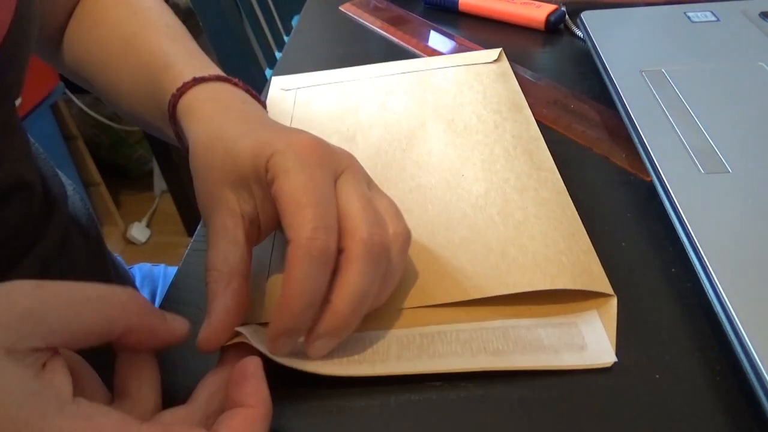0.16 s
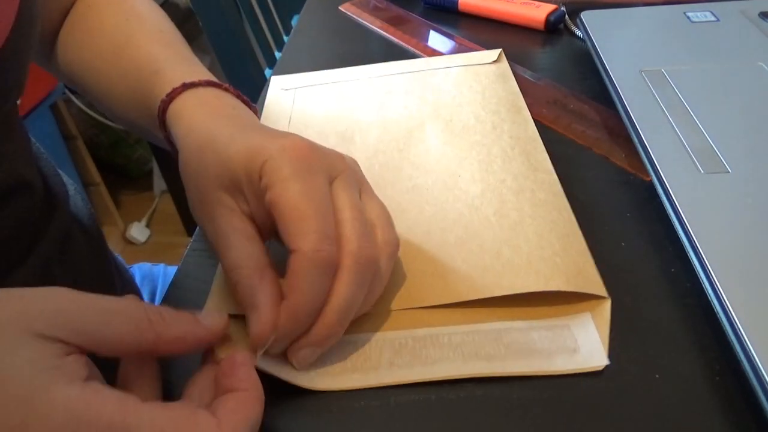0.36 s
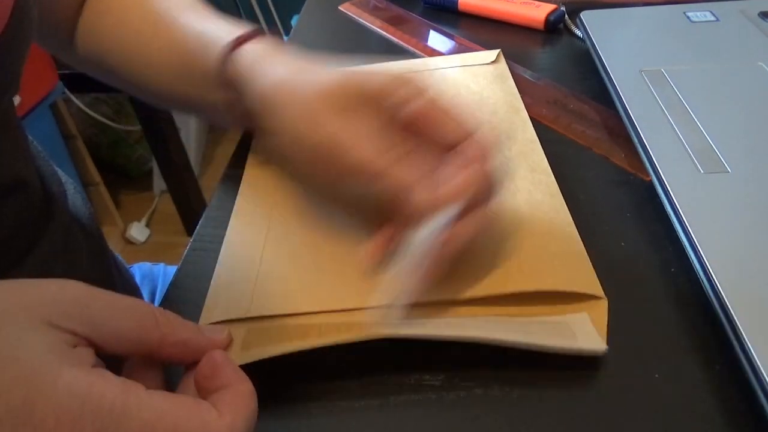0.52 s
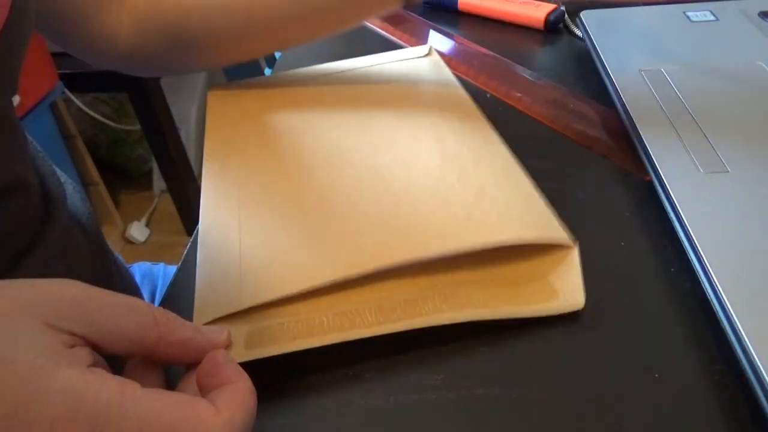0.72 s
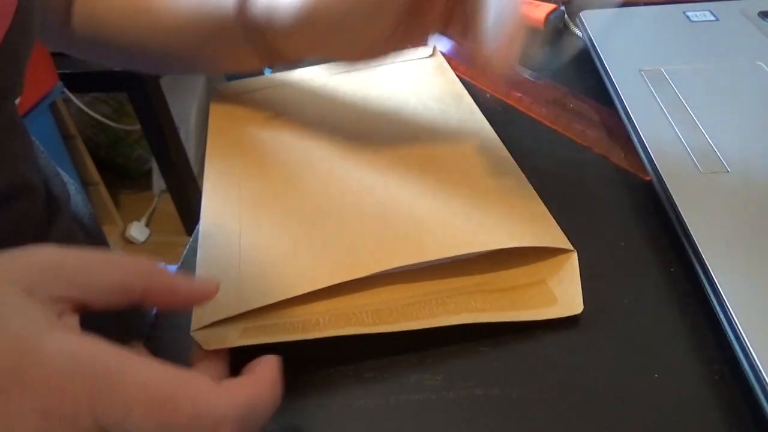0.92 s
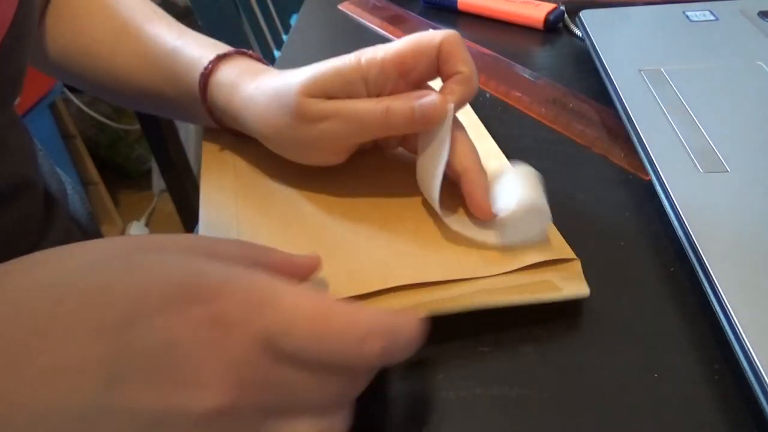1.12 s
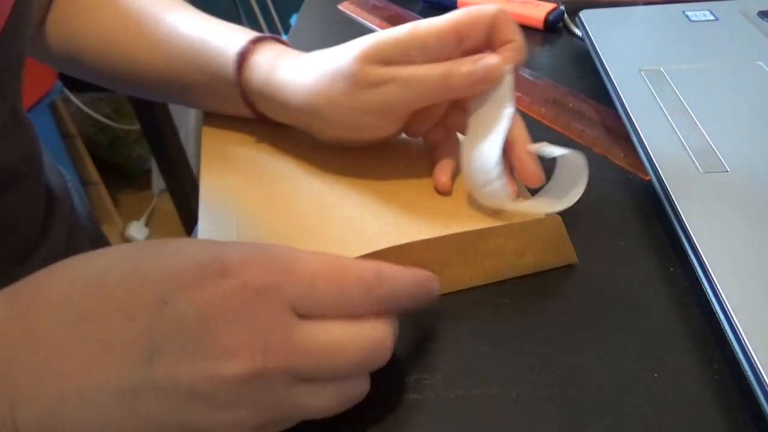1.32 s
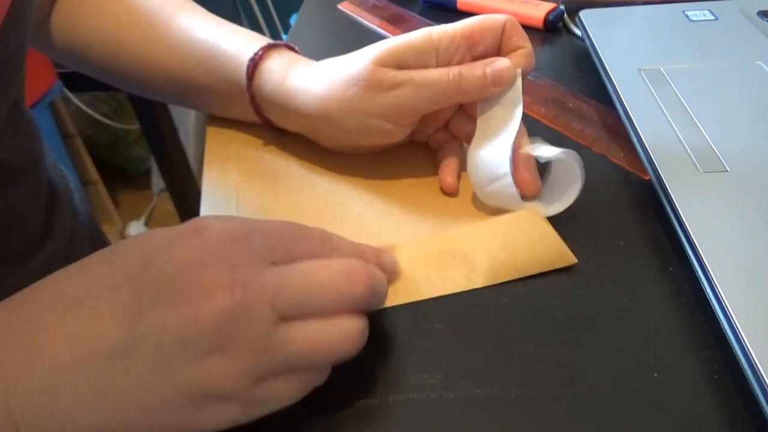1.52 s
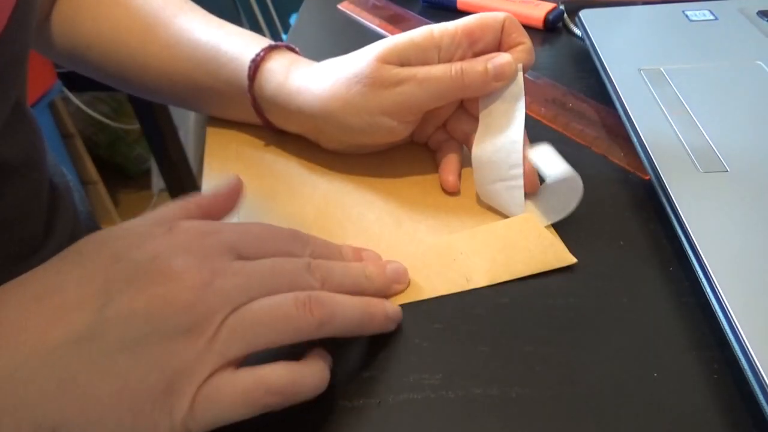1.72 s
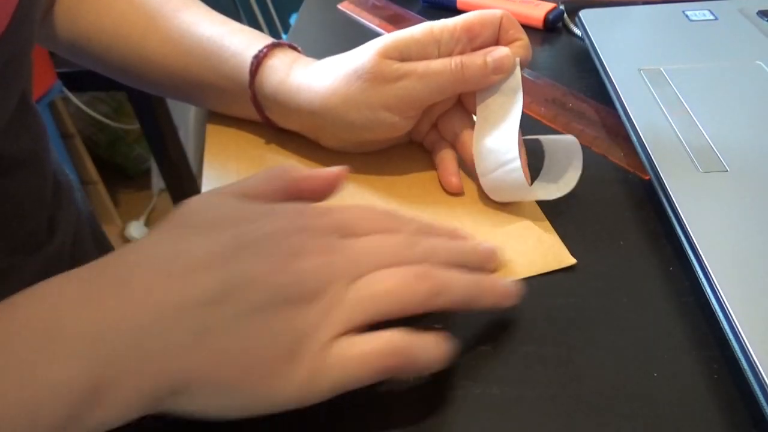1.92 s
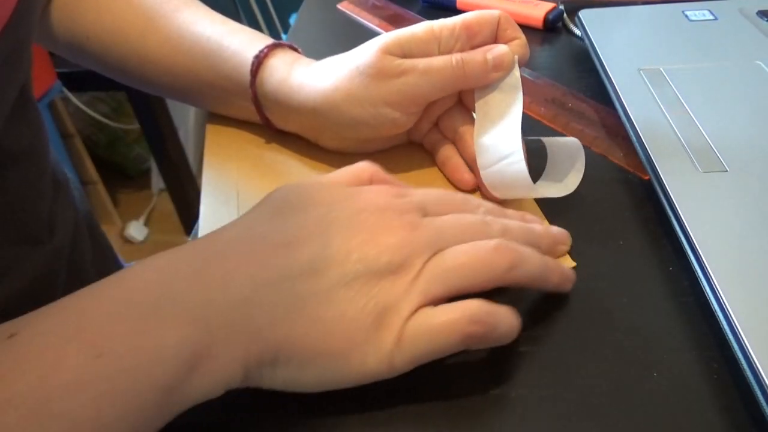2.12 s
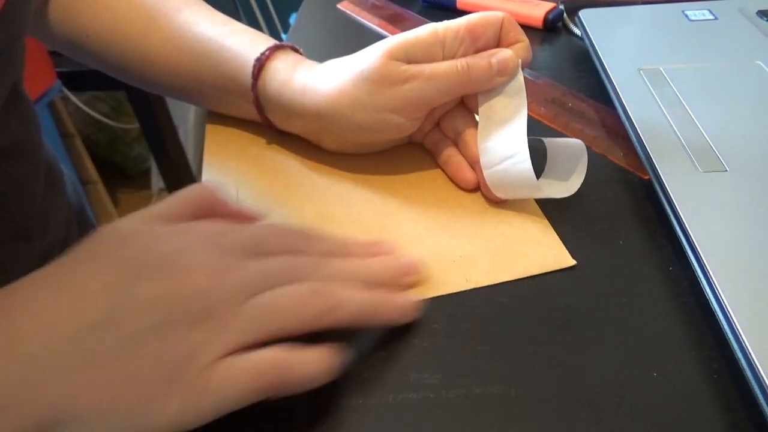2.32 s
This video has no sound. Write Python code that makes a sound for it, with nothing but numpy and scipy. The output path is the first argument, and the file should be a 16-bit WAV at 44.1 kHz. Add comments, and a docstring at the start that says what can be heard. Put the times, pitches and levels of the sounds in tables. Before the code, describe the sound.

A backing strip is peeled from a paper envelope, close up in a quiet room. Fingers scratch and pick with small snaps until a bright, crackling rip, the loudest sound, from 0.5 to 0.75 seconds. The envelope slides softly, then its flap folds with crisp crackles from 1.3 to 1.75. Two soft smoothing strokes follow at 1.9 and 2.25, with a very faint thin tone sagging at the end.

```python
"""Peeling and sealing an envelope

At a desk in a quiet room, fingers pick at the backing strip of a paper envelope and rip it off.
The glue yields by stick-slip: separate snaps, then a dense rasp whose resonances fall as the freed
strip grows. The envelope slides, its flap is folded over with a crackle, and a hand smooths it down,
each stroke sounding by friction on the fibres. A faint thin tone sags near the end."""
import sys
import numpy as np
from scipy import signal
from scipy.fft import rfft, irfft
from scipy.io import wavfile
from scipy.ndimage import uniform_filter1d

SR = 44100
rng = np.random.default_rng(int(sys.argv[2]) if len(sys.argv) > 2 else 0)


def waveform_to_disk(signal):
    """Save audio, clipped to [-1, 1], as 16-bit WAV at the path in sys.argv[1]."""
    frames = np.transpose(np.atleast_2d(signal))
    scaled = np.clip(frames, -1, 1) * 32767
    samples = np.round(scaled).astype(np.int16)
    wavfile.write(sys.argv[1], SR, samples)


N = 103635
T = np.arange(N) / SR
HZ = np.fft.rfftfreq(N, 1 / SR)

# Course of the rip: time_s, level_db, low_mids_relative_db
PEEL_STROKE = [(.49, -34.5, -9.5), (.53, -31, 1), (.56, -24.5, -7), (.615, -20.5, -3.5), (.675, -19.5, -4),
               (.714, -20, -6.5), (.729, -28, -12.5), (.76, -35, -10)]
# Spectrum of the rasp: frequency_hz, gain_db
PEEL_SPECTRUM = [(90, -25.5), (240, -11), (800, -2.5), (1900, 0), (4500, -3.5), (9000, 1), (12000, -12.5),
                 (16000, -20.5)]
def peel(slips_per_s=(150, 520), slip_decay_s=0.00099):
    """Stick-slip: glue lets go ever faster, each slip a burst of crackle that drives the paper."""
    rate = np.interp(T, [PEEL_STROKE[0][0], PEEL_STROKE[-1][0]], slips_per_s)
    jitter = np.exp(.5 * wander(100))
    slip_count = np.cumsum(rate * jitter) / SR
    since_slip_s = (slip_count % 1) / rate
    drive = grains(7000, 0.78, hiss=0.73) * (0.2 + np.exp(-since_slip_s / slip_decay_s))
    drive /= np.sqrt(uniform_filter1d(drive ** 2, size=900) + 1e-9)  # even out the power
    rasp = sheet(drive, PEEL_STROKE, PEEL_SPECTRUM, split_hz=3500)
    return rasp + freed_strip(drive) + crinkles(PEEL_STROKE, per_s=260, boost_db=3.5, hz=2640)


# Modes of the freed strip: peak_s, spread_s, pitch_at_peak_hz, fall_octaves_per_s, level_db
STRIP_MODES = [(0.661, 0.02, 1495, 10, -28.5), (0.641, 0.033, 2490, 6, -30), (.66, 0.018, 3490, 9.9, -25),
               (.62, 0.02, 4800, 5.1, -26)]
def freed_strip(drive, bandwidth_hz=810):
    """Forced resonance: the strip's natural frequencies fall as it lengthens."""
    pole = np.exp(-np.pi * bandwidth_hz / SR)
    out = np.zeros(N)
    for s, spread, hz, fall, db in STRIP_MODES:
        pitch = hz * 2 ** (-fall * np.clip(T - s, -.1, .1))
        carrier = np.exp(2j * np.pi * np.cumsum(pitch) / SR)
        ring = (carrier * signal.lfilter([1], [1, -2 * pole, pole * pole], drive / carrier)).real
        swell = np.exp(-((T - s) / spread) ** 2 / 2)
        out += amp(db) * swell * ring / np.sqrt(np.average(ring ** 2, weights=swell ** 2))
    return out


SNAP_DECAY_S = 0.00052
# Snaps of glue and paper: start_s, level_db, centre_hz, width_octaves
RELEASES = [(0.0105, -21, 5060, 3.7), (0.3677, -12.5, 9500, 1.2), (.4030, -10.5, 4700, 0.66),
            (0.5279, -14.5, 7560, 0.58), (0.534, -23, 3000, 2), (0.5385, -9, 2290, 1.5),
            (0.5456, -12, 3000, 3.7), (.5612, -7, 7600, 0.38), (0.5785, -11, 7000, 1.2),
            (0.5846, -17, 6530, 1.7), (0.7057, -18, 1700, 2.4), (0.7196, -10.5, 7660, 0.58),
            (1.4390, -20, 1960, 1.43), (1.5093, -12.5, 3700, 1.75), (1.5865, -10.5, 6200, 0.94),
            (1.5912, -11, 6360, 0.3), (1.5950, -11.5, 5640, 1.1), (1.6006, -7, 4150, 0.64),
            (1.6140, -13, 5400, 0.61), (1.734, -12.5, 6200, 1.2)]
def snaps():
    """Impulsive release: glue and paper give way, the broader snaps lasting longer."""
    out = np.zeros(N)
    for s, db, hz, octaves in RELEASES:
        add(out, s, impulse(db, hz, octaves, SNAP_DECAY_S * np.sqrt(octaves), crack=0.55))
    return out


def crinkles(stroke, per_s, boost_db, hz):
    """Random impulses: small patches of paper snap during a stroke, each in its own band."""
    s, level, _ = np.transpose(stroke)
    length_s = s[-1] - s[0]
    out = np.zeros(N)
    for when, weakness, height in rng.random((round(per_s * length_s), 3)):
        start_s = s[0] + when * length_s
        db = np.interp(start_s, s, level) + boost_db - 10 * weakness
        centre_hz = hz * 2 ** (2 * height - 1)
        add(out, start_s, impulse(db, centre_hz, octaves=0.46, decay_s=SNAP_DECAY_S, crack=.5))
    return out


FIBRES_PER_S = 2500
# Strokes of skin and paper: time_s, level_db, low_mids_relative_db
PICK_STROKE = [(0, -36, -12), (.07, -35.5, -22.5), (.145, -32.5, -7), (.19, -34, -9), (.24, -30, -11.5),
               (.283, -32.5, -16), (.295, -24.5, -15.5), (.385, -34.5, -9.5), (.445, -39.5, -12),
               (.463, -29, -9.5), (.49, -41.5, 7.5)]
SLIDE_STROKE = [(.76, -33, -6.5), (.83, -44, -10), (.92, -52, -16), (.98, -39, -35.5), (1.045, -47.5, -26),
                (1.075, -38.5, -15.5), (1.14, -45, -22), (1.2, -41, -9), (1.27, -44.5, -13.5)]
FOLD_STROKE = [(1.27, -47.5, -7), (1.298, -27.5, -7), (1.39, -44, -0.5), (1.46, -40, -4.5),
               (1.525, -39.5, -7.5), (1.615, -26.5, -11), (1.68, -37, -16), (1.733, -27, -15),
               (1.742, -46.5, -9), (1.82, -60, -21)]
SMOOTH_STROKE = [(1.85, -56.5, -7), (1.9, -37, -19.5), (2.09, -41, -16), (2.17, -58, -7.5),
                 (2.205, -56.5, -10), (2.235, -41.5, -23), (2.35, -39.5, -21)]
# Their friction spectra: frequency_hz, gain_db
PICK_SPECTRUM = [(120, -30), (600, -17), (1100, -15), (1800, -0.5), (3200, -9.5), (4900, 0), (6200, -6),
                 (8700, -2), (16000, -23.5)]
PAPER_SPECTRUM = [(150, -22.5), (550, -7), (1600, 0), (3000, -1), (8500, 3), (12000, -8), (16000, -20)]
SMOOTH_SPECTRUM = [(150, -20), (700, -22), (1800, -15), (2800, -9.5), (5500, -9), (8800, 1), (16000, -17)]
def strokes():
    """Friction noise: picking, sliding, folding the flap with a crackle, then smoothing it."""
    pick = rub(PICK_STROKE, PICK_SPECTRUM, grain_db=1.1)
    slide = rub(SLIDE_STROKE, PAPER_SPECTRUM, grain_db=2.5)
    fold = rub(FOLD_STROKE, PAPER_SPECTRUM, grain_db=3.0)
    fold += crinkles(FOLD_STROKE, per_s=100, boost_db=6, hz=3300)
    smooth = rub(SMOOTH_STROKE, SMOOTH_SPECTRUM, grain_db=2.0)
    return pick + slide + fold + smooth


def rub(stroke, spectrum, grain_db, judder_db=1.36):
    """Sliding friction: skin and paper catch on fibres, and an uneven grip modulates the level."""
    grip = amp(judder_db * wander(260))
    return sheet(grains(FIBRES_PER_S, grain_db, hiss=1) * grip, stroke, spectrum, split_hz=2850)


# Scuffs of paper on paper: start_s, length_s, level_db, centre_hz, width_octaves
PAPER_SCUFFS = [(1.2906, 0.0072, -20, 7800, 0.38), (1.567, 0.0066, -27.5, 1940, 1),
                (1.8227, 0.026, -28, 5600, 1.2), (1.886, 0.0073, -29, 4330, 1.22)]
def scuffs():
    """Transient friction: a brief contact bites quickly and runs out."""
    out = np.zeros(N)
    for s, length, db, hz, octaves in PAPER_SCUFFS:
        progress = np.clip((T - s) / length, 0, 1)
        swell = np.sqrt(np.minimum(10 * progress, 1 - progress))
        out += amp(db) * swell * tint(grains(FIBRES_PER_S, 2.2, hiss=1), patch(HZ, hz, octaves))
    return out


# Taps and rings of the envelope: start_s, level_db, centre_hz, width_octaves, decay_s
PAPER_TAPS_AND_RINGS = [(0.01, -52.5, 640, 0.73, 0.081), (0.9008, -32.5, 980, 1.03, 0.0022),
                        (1.073, -48, 830, 1.4, 0.055), (1.402, -39.5, 1740, 0.23, 0.017),
                        (1.441, -31, 1030, 1.6, 0.0065), (1.981, -36, 1050, 0.95, 0.0015)]
def taps_and_rings():
    """Damped vibration: soft taps and brief hollow rings of the envelope as it is handled and folded."""
    out = np.zeros(N)
    for s, *tap in PAPER_TAPS_AND_RINGS:
        add(out, s, impulse(*tap, crack=0.17))
    return out


def impulse(db, hz, octaves, decay_s, crack, size=4096):
    """Impulse response: a click and a dying flutter, filtered by the patch of paper that moves."""
    t = np.arange(size) / SR
    burst = unit(rng.standard_normal(size) * np.exp(-t / decay_s))
    burst[0] -= crack * np.sqrt(size)
    gain = patch(abs(np.fft.fftfreq(size, 1 / SR)), hz, octaves) + 1e-5
    minimum_phase = np.exp(np.conj(signal.hilbert(np.log(gain))))  # no ringing before the onset
    sound = np.fft.ifft(np.fft.fft(burst) * minimum_phase).real
    return amp(db) * sound / np.linalg.norm(sound) * np.sqrt(decay_s * SR)


def grains(per_s, spread_db, hiss):
    """Shot noise: tiny clicks of uneven size over a bed of finer friction."""
    size = amp(spread_db * np.minimum(rng.exponential(1, N), 4)) * rng.choice([-1., 1.], N)
    clicks = size * (rng.random(N) < per_s / SR)
    return unit(clicks) + hiss * rng.standard_normal(N)


def sheet(drive, stroke, spectrum, split_hz, fade_s=0.0051):
    """Forced vibration: paper radiates a drive, its treble and low mids each following the stroke."""
    s, level, low = np.transpose(stroke)
    gate = np.clip(np.minimum(T - s[0], s[-1] - T) / fade_s + .5, 0, 1) ** .5
    gain = amp(read(spectrum, HZ))
    upper = 1 / (1 + (split_hz / (HZ + 1)) ** 6)
    treble = amp(np.interp(T, s, level)) * tint(drive, gain * upper)
    low_mids = amp(np.interp(T, s, level + low)) * tint(drive, gain * (1 - upper))
    return gate * (treble + low_mids)


def patch(f, hz, octaves, low_hz=202, top_hz=12250):
    """Radiation efficiency: a small patch sounds in one band, and little beyond low_hz to top_hz."""
    return hump(f, hz, octaves) * f ** 2 / (f ** 2 + low_hz ** 2) / (1 + (f / top_hz) ** 8)


# Resonances of the envelope: centre_hz, width_octaves, lift_db
CAVITY_MODES = [(550, 0.44, 2), (1770, 0.12, 1)]
def hollow(x):
    """Cavity resonance: the hollow envelope lifts two bands of everything done to it."""
    lift_db = sum(db * hump(HZ, hz, octaves) for hz, octaves, db in CAVITY_MODES)
    return irfft(rfft(x) * amp(lift_db), N)


# Course of the faint tone: time_s, pitch_hz, level_db
WHINE_GLIDE = [(1.76, 735, -68), (1.81, 731, -59), (1.9, 744, -70), (2.065, 733, -76), (2.105, 735, -55.5),
               (2.21, 727, -58.5), (2.245, 707, -50), (2.285, 669, -60.5), (2.35, 635, -54.5)]
def whine(fray_hz=90, fray_depth=.17):
    """Random modulation: a thin tone holds, then sags and frays into roughness."""
    s, hz, db = np.transpose(WHINE_GLIDE)
    waver, flutter = [tint(rng.standard_normal(N), np.exp(-(HZ / fray_hz) ** 2)) for _ in range(2)]
    pitch = np.interp(T, s, hz)
    fray = ((hz.max() - pitch) / np.ptp(hz)) ** 2
    phase = 2 * np.pi * np.cumsum(pitch * (1 + fray_depth * fray * waver)) / SR
    level_db = np.interp(T, s, db, left=-120) + (0.5 + 2 * fray) * flutter
    return amp(level_db) * unit(np.sin(phase) + amp(-12) * np.sin(2 * phase))


# Reverberation time: frequency_hz, t60_s
REVERB_TIMES = [(150, 0.58), (1000, 0.81), (14000, 0.4)]
# Spectral shape of the left-right difference: frequency_hz, weight_db
SIDE_SPECTRUM = [(450, -24), (1100, -22.5), (4500, -18), (9000, -17), (13000, -60)]
def room(x, tail_db=-20, desk_db=-19, desk_decay_s=0.0034):
    """Reflection: desk echoes and a short reverberant tail reach left and right in unlike mixtures."""
    t = np.arange(SR // 2) / SR
    hz, s, spectra = signal.stft(rng.standard_normal((2, len(t))), SR, nperseg=256)
    decay = amp(-60 * s / read(REVERB_TIMES, hz)[:, None])
    tail = signal.istft(spectra * decay, SR, nperseg=256)[1][:, :len(t)]
    early = rng.standard_normal((2, len(t))) * np.exp(-t / desk_decay_s) * (t > .0005)
    response = (amp(tail_db) * unit(tail) + amp(desk_db) * unit(early)) / np.sqrt(len(t))
    shared, apart = signal.fftconvolve(x[None], response, axes=1)[:, :N]
    shifting = x * wander(400)  # the sounding spot shifts across the paper
    side = irfft((.6j * rfft(shifting) + 5 * rfft(apart)) * amp(read(SIDE_SPECTRUM, HZ)), N)
    return x + shared + np.array([side, -side])


# Spectrum of the quiet room: frequency_hz, gain_db
AMBIENT_SPECTRUM = [(70, -5), (95, 8.5), (120, 1), (500, 10.5), (2000, 4.5), (5000, -19), (16000, -22)]
def ambience(shared_db=-58.5):
    """Partly coherent noise: a steady hush, mostly common to left and right."""
    left, right, both = [tint(rng.standard_normal(N), amp(read(AMBIENT_SPECTRUM, HZ))) for _ in range(3)]
    return amp(shared_db) * (both + .5 * np.array([left, right]))


def amp(db):
    """Decibels to gain."""
    return 10 ** (np.asarray(db) / 20)


def unit(x):
    """Normalisation to rms 1."""
    return x / np.sqrt(np.mean(x ** 2) + 1e-20)


def wander(samples):
    """Moving average of noise, at rms 1."""
    return unit(uniform_filter1d(rng.standard_normal(N), size=samples))


def read(points, hz):
    """Interpolation on a log-frequency axis."""
    f, value = np.transpose(points)
    return np.interp(np.log(hz + 1), np.log(f + 1), value)


def add(mix, s, sound):
    """Superposition of a sound at time s."""
    part = mix[max(round(s * SR), 0):][:len(sound)]
    part += sound[:len(part)]


def tint(x, gain):
    """Filtering by a gain for each frequency, to rms 1."""
    return unit(irfft(rfft(x) * gain, N))


def hump(hz, centre_hz, octaves):
    """A bell-shaped passband with gentle skirts."""
    return (1 + (np.log2((hz + 1) / centre_hz) / octaves) ** 2 / 2) ** -2


def scene():
    """Superposition: the paper and the faint tone sound in the room, over its quiet background."""
    paper = peel() + snaps() + taps_and_rings() + scuffs() + strokes()
    hush = ambience()
    return room(hollow(paper) + whine()) + hush


def record(dry, ceiling=0.8, wind_cut_hz=101, edge_hz=16000):
    """Saturation and band limiting: sharp peaks round off, deep bass and top treble fall away."""
    soft = ceiling * np.tanh(dry / ceiling)
    thin = signal.sosfilt(signal.butter(2, wind_cut_hz, "high", fs=SR, output="sos"), soft)
    low_pass = signal.firwin(511, edge_hz, window=("kaiser", 9), fs=SR)
    return signal.oaconvolve(thin, low_pass[None], "same")


dry = scene()
out = record(dry)
waveform_to_disk(out)
```